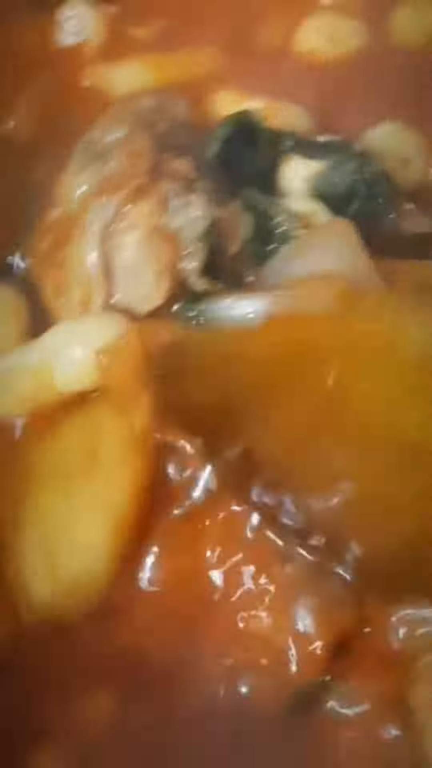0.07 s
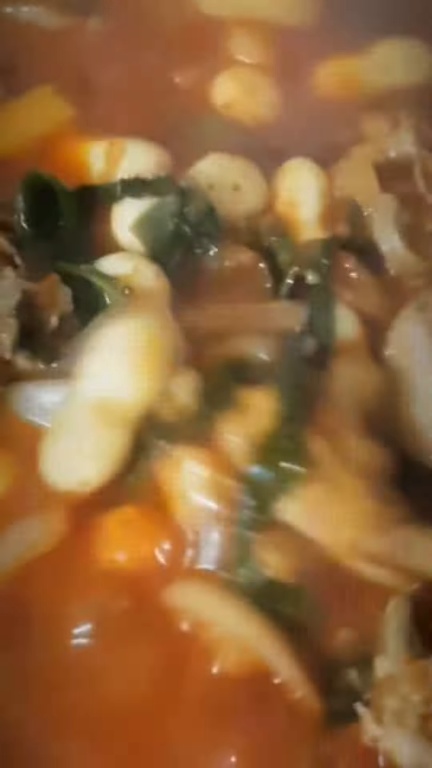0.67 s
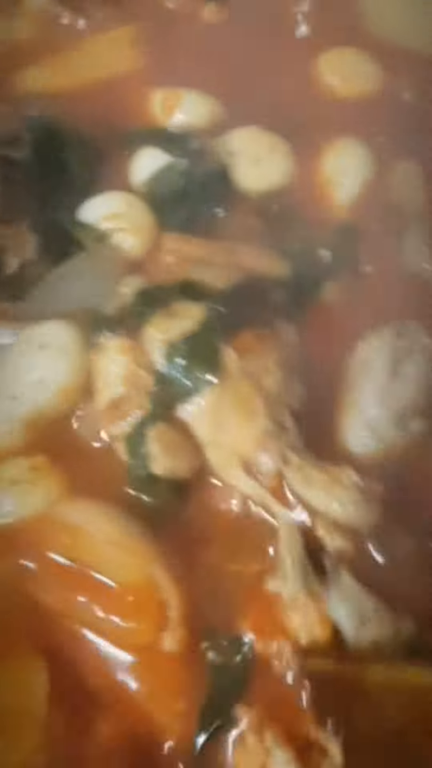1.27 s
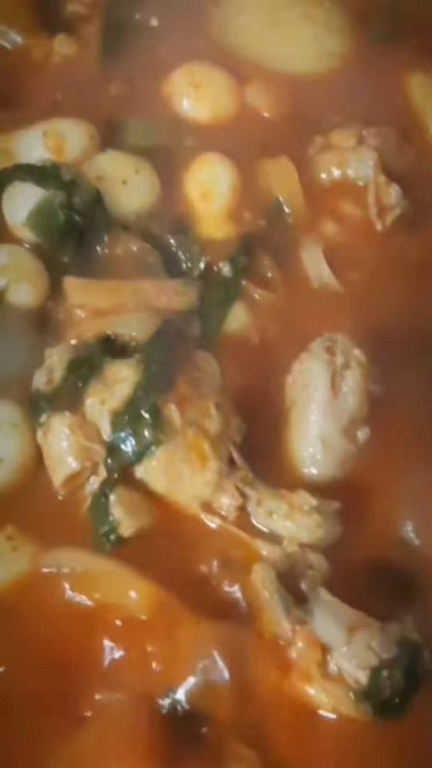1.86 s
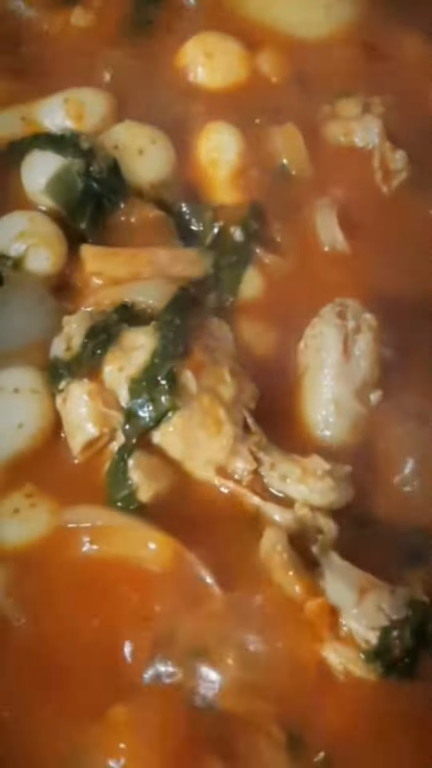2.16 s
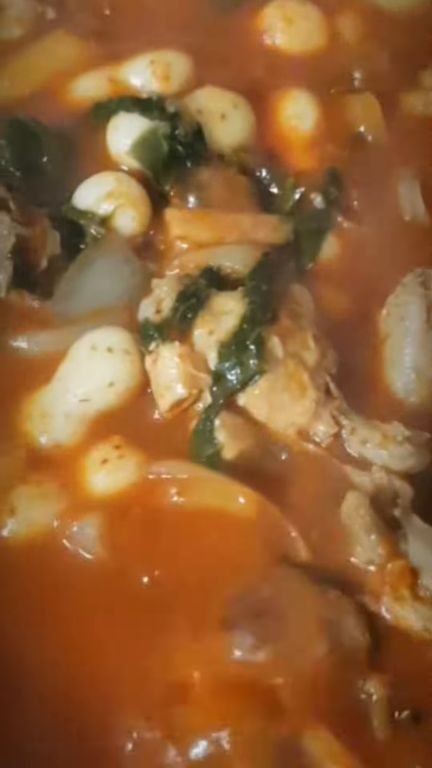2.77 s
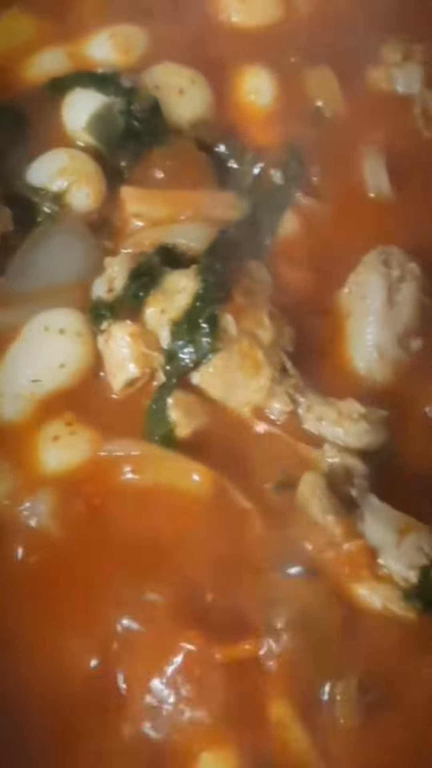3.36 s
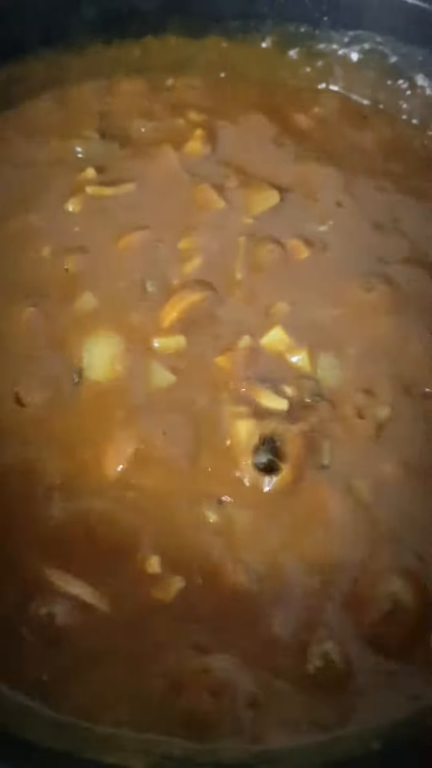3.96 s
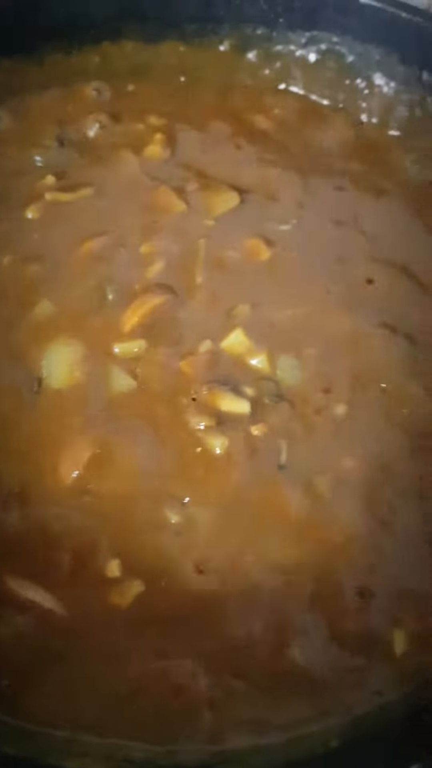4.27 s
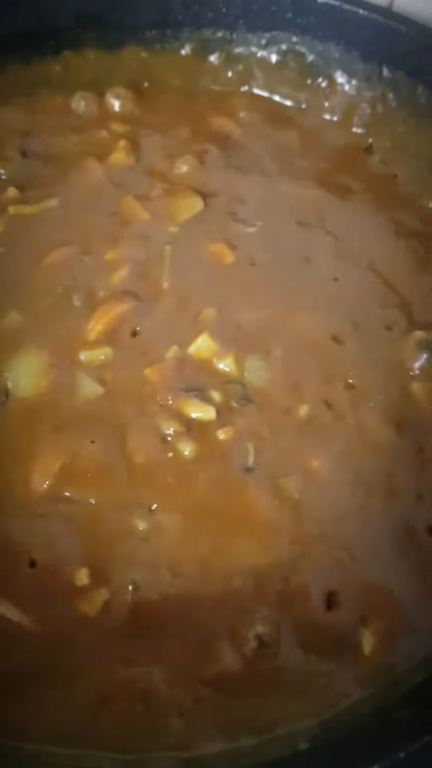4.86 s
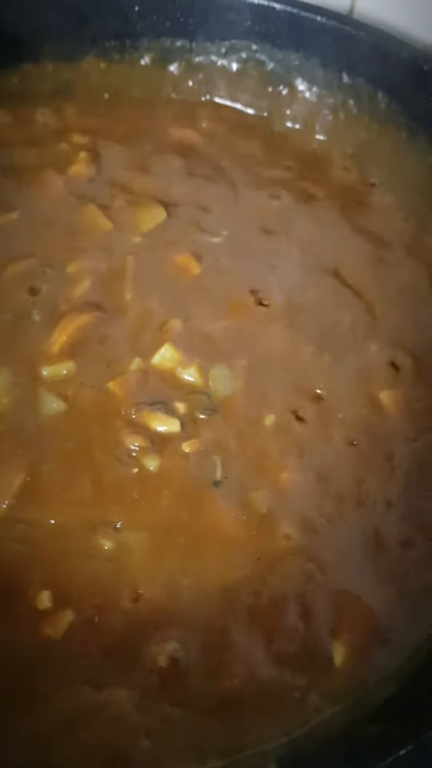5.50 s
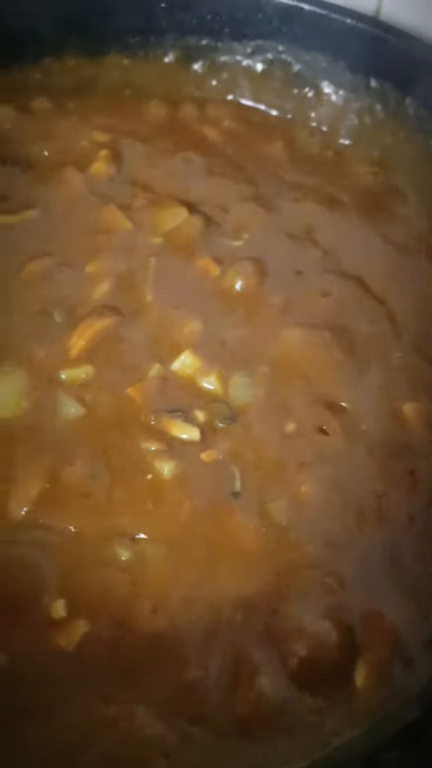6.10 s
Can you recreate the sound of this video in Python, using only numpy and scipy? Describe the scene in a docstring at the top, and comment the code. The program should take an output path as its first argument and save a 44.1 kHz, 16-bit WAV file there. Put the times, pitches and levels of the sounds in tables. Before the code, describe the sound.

From the start, a stew is at a rolling boil on a kitchen stove, heard from just above and a little to the left. A low rumble and wet churning run under frequent plops and a thin hiss from the rim. Three pockets of steam burst with a glug, a thump and a splash at about 0.7, 1.1 and 1.3 seconds; the first is the heaviest and the second the lightest. The boil continues, heaving again around 3.4 to 3.8 seconds, then cuts off. After a tiny gap, at about 3.9 seconds, a much quieter thick sauce simmers in another pot with a low murmur, small pips and a fine sizzle. Soft, deep blups come between 4.5 and 5.7 seconds, and the simmer lasts until the end, just after 6 seconds. Throughout, droplets spit briefly on hot metal.

```python
"""A stew at a rolling boil on a kitchen stove, heard from just above. It rumbles, churns, plops and
hisses as vapour rises and bubbles open; three pockets of steam burst from it with a thump and a splash.
After a short break a thick sauce simmers in a second pot: soft blups, small pips and a fine sizzle
at the rim. Throughout, droplets spit on hot metal."""
import sys
import numpy as np
from scipy import signal
from scipy.fft import rfft, irfft, next_fast_len
from scipy.io import wavfile
from scipy.ndimage import uniform_filter1d, map_coordinates

SR = 44100
rng = np.random.default_rng(int(sys.argv[2]) if len(sys.argv) > 2 else 0)


def digitize_waveform(pressure):
    """Quantize a signal to 16-bit integers and store it at the path in sys.argv[1].

    Rows of a 2-D input are taken as channels; values are limited to [-1, 1].
    """
    field = np.atleast_2d(pressure).T
    bounded = np.clip(field, -1, 1)
    quanta = np.round(bounded * 32767).astype(np.int16)
    wavfile.write(sys.argv[1], SR, quanta)


N = 270774
T = np.arange(N) / SR
TOP_HZ = 15650  # the highest pitch let through


def amp(db):
    """Turn decibels into a gain. A fade time (t60) is the seconds it takes to drop 60 dB."""
    return 10 ** (np.asarray(db) / 20)


def unit(x):
    """Scale a sound to an average (rms) level of 1."""
    return x / np.sqrt(np.mean(x ** 2) + 1e-20)


def along(points, hz):
    """Read between (pitch [Hz], value) points on a log scale."""
    pitches, values = np.transpose(points)
    return np.interp(np.log(hz + 1), np.log(pitches + 1), values)


def curves(rows):
    """Join timed points into one curve for each column after the time."""
    times, *columns = np.transpose(rows)
    return [np.interp(T, times, column) for column in columns]


def wobble(rate):
    """A smooth curve through `rate` random values a second."""
    return map_coordinates(rng.standard_normal(1024), [T * rate], mode="wrap")


def filtered(x, response):
    """Multiply each frequency in x by response(hz)."""
    size = next_fast_len(N + 8192)
    return irfft(rfft(x, size) * response(np.fft.rfftfreq(size, 1 / SR)), size)[..., :N]


def coloured(x, spectrum):
    """Shape the tone of x, then scale it to level 1."""
    return unit(filtered(x, lambda hz: amp(along(spectrum, hz))))


def add(track, s, sound):
    """Mix a sound into a track at s seconds."""
    part = track[..., max(round(s * SR), 0):][..., :sound.shape[-1]]
    part += sound[..., :part.shape[-1]]


def rush(spectrum):
    """Stereo noise: left and right are alike in the bass and unrelated in the treble."""
    # how alike the two sides are: (pitch [Hz], likeness [0 to 1])
    likeness = [(60, 0.95), (180, 0.99), (550, 0.5), (1650, 0.32), (4970, 0.15), (15000, -0.0)]
    angle = lambda hz: np.arccos(np.clip(along(likeness, hz), -1, 1)) / 2
    shares = lambda hz: np.array([np.cos(angle(hz)), np.sin(angle(hz))])
    mid, side = filtered(rng.standard_normal((2, N)), shares)
    return coloured(np.array([mid + side, mid - side]), spectrum)


def swarm(count, centre_hz, octaves, spread_db):
    """Random bubbles or droplets, as rows of (time [s], level [dB], pitch [Hz])."""
    size, pitch = np.clip(rng.standard_normal((2, count)), -2, 2)
    times = rng.uniform(0, N / SR, count)
    return np.transpose([times, spread_db * size, centre_hz * 2 ** (octaves * pitch)])


def bubbles(rows, cycles, rise, onset, samples=1500):
    """Each bubble swells over `onset` cycles, dies within `cycles` and rises in pitch as it opens."""
    s, db, hz = np.transpose(rows)[:, :, None]
    turns = hz * np.arange(samples) / SR
    age = np.minimum(turns / cycles, 1)
    shape = amp(-60 * age) * (1 - age ** 4) * (1 - np.exp(-(turns / onset) ** 2))
    shape /= shape.max(axis=1, keepdims=True)
    waves = amp(db) * shape * np.sin(2 * np.pi * turns * (1 + rise * age / 2))
    positions = np.round(s * SR).astype(int) + np.arange(samples)
    return np.bincount(positions.ravel(), waves.ravel(), N)[:N]


def neighbours(rows, delay_s, scatter_s, below_db, octaves, count=4):
    """Smaller bubbles open around each large one, most of them just after it."""
    s, db, hz = np.repeat(rows, count, axis=0).T
    when, size, pitch = np.clip(rng.standard_normal((len(s), 3)), -2, 2).T
    times = np.abs(s + delay_s + scatter_s * when)
    return np.transpose([times, db - below_db + 2 * size, hz * 2 ** (octaves * pitch)])


def smacks(rows, t60):
    """The film over each bubble tears with a short, dry puff."""
    # a thick film tearing: (pitch [Hz], level [dB])
    tear_tone = [(150, -33), (500, 20.5), (1000, 0.5), (2000, 4.5), (3500, -7), (6000, -20), (12000, -33)]
    loudness = np.zeros(N)
    t = np.arange(SR // 16) / SR
    for s, db, _ in rows:
        add(loudness, s, amp(db - 60 * t / t60))
    return loudness * coloured(rng.standard_normal(N), tear_tone)


def crackle(count, spread_db):
    """Tiny clicks of very unequal size."""
    sizes = amp(spread_db * np.clip(rng.standard_normal(count), -2, 2)) * rng.choice([-1, 1], count)
    return np.bincount(rng.integers(0, N, count), sizes, N)


def in_pot(x, wall_db, wall_t60, room_db=-15, room_t60=0.1, spots=6):
    """Pot walls and kitchen scatter the sound; each spot on the surface has its own echoes."""
    # tone of the echoes: (pitch [Hz], level [dB])
    echo_tone = [(100, -28), (350, -18), (800, 6), (15000, 9.5)]
    t = np.arange(SR // 4) / SR
    spot = rng.integers(0, spots, N // 512 + 1)[np.arange(N) // 512]  # picked every 512 samples
    echoes = np.zeros((2, N))
    for k in range(spots):
        near, far = rng.standard_normal((2, 2, len(t)))
        walls = amp(wall_db) * unit(near * amp(-60 * t / wall_t60))
        room = amp(room_db) * unit(far * amp(-60 * t / room_t60))
        here = x * uniform_filter1d(1.0 * (spot == k), 128)
        echoes += signal.oaconvolve(here[None], (walls + room) / np.sqrt(len(t)), axes=1)[:, :N]
    return x + filtered(echoes, lambda hz: amp(along(echo_tone, hz)))


def aimed(x, balance, lead_s=0.00011):
    """The left microphone faces the pot: it hears more of it, and slightly sooner."""
    tilt = lambda hz: amp(np.array([-along(balance, hz), along(balance, hz)]))
    time_shift = lambda hz: np.exp(np.pi * 1j * lead_s * np.array([hz, -hz]))
    return filtered(x, lambda hz: 2 / (1 + tilt(hz)) * time_shift(hz))


def plops(swell_db):
    """Single bubbles open on the stew; the lesser ones grow louder as the boil swells."""
    # the largest bubbles: (time [s], level [dB], pitch [Hz])
    largest = [(.0374, -19.5, 610), (.2082, -19.5, 870), (.2623, -15, 1770), (.2824, -17.5, 2230),
               (.4066, -22, 1100), (.983, -19.5, 1380), (1.1097, -18.5, 1480), (1.1663, -23, 1450),
               (1.6555, -15, 1950), (2.0266, -24, 856), (2.1148, -19.5, 960), (2.2796, -16, 1290),
               (2.4429, -20, 960), (2.6376, -17.5, 1010), (2.6929, -18, 1290), (2.9407, -19, 1900),
               (3.0662, -18.5, 1730), (3.1222, -14, 1450), (3.2545, -19.5, 720), (3.48, -22, 1300),
               (3.5221, -21, 2153), (3.5545, -14.5, 1240), (3.7685, -21.5, 1610)]
    large = bubbles(largest, cycles=14, rise=.05, onset=.7)
    medium = bubbles(swarm(55, centre_hz=950, octaves=.45, spread_db=2), cycles=9, rise=.05, onset=.6)
    nearby = neighbours(largest, delay_s=.0055, scatter_s=.009, below_db=6.5, octaves=.64)
    small = bubbles(nearby, cycles=9.9, rise=.073, onset=.45)
    tiny = swarm(130, centre_hz=2250, octaves=.22, spread_db=2.5)
    splatter = bubbles(tiny, cycles=8, rise=.05, onset=.6)
    lesser = amp(swell_db) * (amp(-23.5) * medium + amp(-30) * splatter)
    film = amp(-12.5) * smacks(largest, t60=.009)
    return in_pot(large + lesser + small + film, wall_db=-10, wall_t60=.035)


def stew():
    """Vapour heaves at the bottom, bubbles crowd and open at the top, and the rim hisses."""
    # strength of the boil: (time [s], churn level [dB], rim hiss level [dB])
    boil = [(0.0, -36, -42), (0.3, -35, -43), (0.54, -36, -42), (0.74, -34, -46), (1.35, -38, -46.5),
            (1.72, -39, -47), (3.22, -36, -45.5), (3.66, -35, -46)]
    # vapour heaving up through the stew: (time [s], swell [dB])
    heaves = [(.96, 10), (2.11, 4.5), (2.55, 0.5), (3.41, 5.5), (3.59, 2.5), (3.73, 9), (3.8, 4.5)]
    # tone of the bottom, the surface and the rim: (pitch [Hz], level [dB])
    rumble_tone = [(20, -42), (38, -16), (55, -6.5), (85, -4.5), (105, 0), (130, 1.5), (170, -9),
                   (220, -21), (400, -26), (900, -74)]
    churn_tone = [(100, -35), (220, 5), (320, 2.5), (550, -2.5), (850, -5.5), (1300, -10.5), (2000, -7.5),
                  (3000, -18.5), (5000, -58), (12000, -68)]
    hiss_tone = [(1000, -16), (2500, -1), (4000, 0), (7000, -1), (8200, -6.5), (9800, -3), (11200, 1.5),
                 (12300, 3.5), (13700, 0.5), (15500, -2)]
    # how much louder the left side is: (pitch [Hz], left minus right [dB])
    balance = [(60, 7), (110, 7.5), (200, 6.5), (380, 4), (700, 9), (1290, 11), (2380, 5), (4400, 2.5),
               (8120, 3.0), (15000, 5)]
    boil_db, rim_db = curves(boil)
    swell_db = boil_db - boil_db.mean()
    heave_db = sum(db * np.exp(-((T - s) / .029) ** 2) for s, db in heaves)  # brief bell curves
    rumble = amp(-32.5 + .31 * swell_db + heave_db + 1.5 * wobble(12)) * rush(rumble_tone)
    surface = swarm(2000, centre_hz=900, octaves=.7, spread_db=3.5)
    crowd = bubbles(surface, cycles=8, rise=.06, onset=.6, samples=1000)
    crowd = unit(in_pot(crowd * amp(1.5 * wobble(30)), wall_db=-6, wall_t60=.035))
    wash = amp(-4.5 + 2.6 * wobble(45)) * rush(churn_tone)
    # only part of each heave reaches the surface and the rim
    churn = amp(boil_db + .46 + .32 * heave_db) * (crowd + wash)
    pops = plops(swell_db)
    fizz = unit(in_pot(crackle(7000, spread_db=6.5), wall_db=12, wall_t60=.044))
    rim = amp(4.5) * rush(hiss_tone) + amp(1.15) * coloured(fizz, hiss_tone)
    hiss = amp(rim_db + .42 * heave_db) * rim
    return aimed(rumble + churn + pops + hiss, balance)


def spits():
    """Droplets on hot metal flash to steam, each with a sharp puff of bright noise."""
    # the loudest droplets: (time [s], level [dB], pitch [Hz], fade time [s])
    loudest = [(0.038, -32, 4080, 0.032), (.298, -30, 3780, .02), (0.4065, -16.5, 6800, 0.0083),
               (.97, -34, 3760, 0.12), (1.385, -30.5, 3480, .023), (3.403, -35.5, 4050, 0.13),
               (3.722, -33.5, 4580, 0.037), (4.2627, -37, 8250, .022), (4.607, -43.5, 9000, 0.055),
               (4.8425, -37.5, 8500, .012), (5.0909, -23.5, 4800, 0.004), (5.975, -43, 10000, 0.05)]
    droplets = swarm(36, centre_hz=5200, octaves=.45, spread_db=2.5)
    faint = [(s, db - 43, hz, .014) for s, db, hz in droplets]
    out = np.zeros(N)
    t = np.arange(SR // 8) / SR
    for s, db, hz, t60 in loudest + faint:
        band = signal.butter(1, [hz / 2, min(2 * hz, TOP_HZ)], "band", fs=SR)
        puff = unit(signal.lfilter(*band, rng.standard_normal(len(t))))
        add(out, s, amp(db - 60 * t / t60) * puff)
    return in_pot(out, wall_db=-7, wall_t60=.035) * amp([[1], [-4]])  # louder on the left


def mouth(x, centre_hz, gain_db, q):
    """An opening boosts the pitches near its own note; a higher q narrows the boost."""
    damping = lambda hz: 1j * hz * centre_hz / q
    peak = lambda hz: damping(hz) / (centre_hz ** 2 - hz ** 2 + damping(hz))
    return unit(filtered(x, lambda hz: 1 + amp(gain_db) * peak(hz)))


def bursts(boom_hz=56.6):
    """A pocket of steam glugs, sets the pot booming and throws up broth and spray until it is empty."""
    # steam pockets: (time [s], glug [dB], glug pitch [Hz], boom [dB], pot ring [dB], splash [dB],
    # splash pitch [Hz], spray [dB], base fade time [s], time to empty [s])
    pockets = [(.664, -8, 343, -1.5, -9.5, -6, 750, -13.5, 0.18, 0.11),
               (1.081, -13.5, 245, -27, -17.5, -19, 524, -24, 0.12, 0.063),
               (1.282, -3.5, 149.6, -13, -12, -12.5, 1680, -21.5, 0.44, 0.17)]
    # notes of the pot and the air around it: (pitch [Hz], level [dB], fade time [times the base])
    pot_notes = [(124.2, 3, 1.88), (177.2, -4.5, 1.14), (318, -9, 1.74), (414, -19, 1.1), (482, -17.5, 1.8)]
    # tone of thrown broth and fine spray: (pitch [Hz], level [dB])
    splash_tone = [(60, -10), (200, -2.5), (350, -0.5), (600, -4.5), (760, -3), (1100, -6), (1350, -11),
                   (1700, -10.5), (2300, -19.5), (4000, -22.5), (9000, -43)]
    spray_tone = [(700, 1), (2500, 5.5), (4000, 4), (6000, -2.5), (9000, -7), (15500, -5)]
    # how much louder the left side is: (pitch [Hz], left minus right [dB])
    balance = [(200, 7.5), (380, 5.9), (700, 1.8), (1300, 2), (4400, 5.7)]
    broth = rush(splash_tone) * amp(1.5 * wobble(130))
    mist = rush(spray_tone) * amp(1.6 * wobble(160))
    out = np.zeros((2, N))
    t = np.arange(SR // 2) / SR
    note = lambda hz, t60: amp(-60 * t / t60) * (1 - np.exp(-t * hz / .52)) * np.sin(2 * np.pi * hz * t)
    for s, glug_db, glug_hz, boom_db, ring_db, splash_db, splash_hz, spray_db, t60, length in pockets:
        now = slice(round(s * SR), round(s * SR) + len(t))
        vent = (1 - np.exp(-t / .0021)) * amp(-60 * np.maximum(t - length, 0) / .29)
        boom = amp(boom_db) * note(boom_hz, 1.56 * t60)
        ring = sum(amp(ring_db + db) * note(hz, t60 * life) for hz, db, life in pot_notes)
        splash = amp(splash_db - 60 * t / t60) * mouth(broth, splash_hz, gain_db=2, q=3)[:, now]
        spray = amp(spray_db - 60 * t / (.6 * t60)) * mist[:, now]
        add(out, s, vent * (boom + ring + splash + spray))
        out += bubbles([(s, glug_db, glug_hz)], cycles=8.4, rise=.081, onset=1, samples=6000)
    return aimed(out, balance)


def sauce():
    """The thick sauce murmurs and blups; small bubbles smack open and the rim sizzles."""
    # strength of the simmer: (time [s], level [dB])
    simmer = [(3.9, -40.5), (4.13, -46), (4.27, -41), (4.85, -40.5), (5.0, -43.5), (5.09, -39), (5.52, -41),
              (5.7, -40), (6.14, -40.5)]
    # big slow bubbles, and the loudest small ones: (time [s], level [dB], pitch [Hz])
    slow_bubbles = [(4.4778, -30, 120), (4.5993, -30, 146), (4.718, -30.5, 152), (4.8892, -26, 140),
                    (5.0896, -22.5, 128), (5.2264, -22, 155), (5.6682, -25, 187)]
    loud_pips = [(4.8925, -36, 990), (5.091, -25.5, 1700), (5.2959, -31, 1250), (5.3992, -32, 1800),
                 (5.6609, -33.5, 1480), (5.7443, -34, 1980)]
    # tone of the sauce and of the rim: (pitch [Hz], level [dB])
    murmur_tone = [(15, -46), (25, -36), (37, -19), (58, 5), (71, -9), (81, -8), (119, -5.5), (204, -8.5),
                   (393, -22.5), (495, -19), (535, -22), (757, -24), (1950, -35.5), (2500, -47),
                   (3250, -69), (5500, -120)]
    sizzle_tone = [(900, -20), (2000, 4), (3200, 2.5), (4500, 4.5), (6500, -0.5), (7900, -7), (9000, -1),
                   (11000, 0), (13000, -2.5), (15500, -13)]
    # how much louder the left side is: (pitch [Hz], left minus right [dB])
    balance = [(60, 12), (200, 8), (380, 8.3), (1300, 11.7), (2400, 12.3), (3500, 1.5), (7000, 2.2),
               (8400, 16), (11000, 9.8), (15000, 14)]
    simmer_db, = curves(simmer)
    sizzle_db = -54 + .83 * (simmer_db - simmer_db.mean()) + .74 * wobble(14)
    deep = swarm(420, centre_hz=248, octaves=.43, spread_db=3.5)
    gurgle = unit(bubbles(deep, cycles=6.9, rise=.13, onset=.5, samples=3000))
    murmur = amp(simmer_db + 1) * rush(murmur_tone) + amp(simmer_db - 8.5) * gurgle
    blups = amp(-1.5) * bubbles(slow_bubbles, cycles=5.3, rise=.15, onset=.39, samples=4000)
    small = swarm(420, centre_hz=1900, octaves=.75, spread_db=3.5)
    crowd = unit(unit(bubbles(small, cycles=9, rise=.05, onset=.4)) + unit(smacks(small, t60=.006)))
    soft_pips = swarm(36, centre_hz=2100, octaves=.65, spread_db=2) + [0, -36, 0]  # 36 dB down
    all_pips = np.vstack([loud_pips, soft_pips])
    pips = bubbles(all_pips, cycles=8, rise=.04, onset=.5) + amp(-4) * smacks(all_pips, t60=.008)
    crowd *= amp(sizzle_db - 4 + 2.5 * wobble(10))  # the tiny pops swell in bunches
    film = amp(-15.5) * smacks(slow_bubbles, t60=.064)
    pops = in_pot(crowd + amp(-1) * pips + film, wall_db=-6, wall_t60=.019)
    fizz = unit(in_pot(crackle(2200, spread_db=4), wall_db=-2, wall_t60=.012))
    sizzle = amp(sizzle_db + 1) * rush(sizzle_tone) + amp(sizzle_db + .1) * coloured(fizz, sizzle_tone)
    return aimed(murmur + blups + pops + sizzle, balance)


def scene():
    """The stew, a short break, then the sauce, all over the faint hush of the kitchen."""
    stew_end_s, sauce_start_s = 3.846, 3.878
    stew_on = np.clip((stew_end_s - T) / .00078, 0, 1)
    sauce_on = np.clip((T - sauce_start_s) / .0012, 0, 1)
    hush = amp(-69) * rush([(60, -1), (300, -12), (2000, -6), (15000, -29)])
    return stew_on * (stew() + bursts()) + sauce_on * sauce() + spits() + hush


def record(dry, low_hz=41):
    """The microphones lose the deepest bass, loud peaks round off and the highest treble is cut."""
    lean = signal.sosfilt(signal.butter(4, low_hz, "high", fs=SR, output="sos"), dry)
    rounded = lean / (1 + np.abs(lean) ** 8) ** (1 / 8)
    return filtered(rounded, lambda hz: hz < TOP_HZ)


dry = scene()
out = record(dry)
digitize_waveform(out)
```